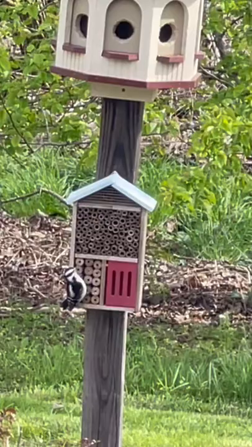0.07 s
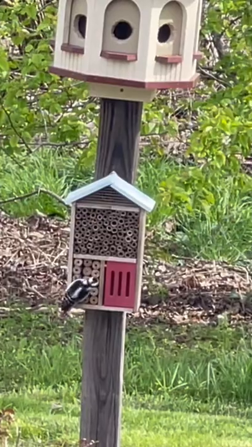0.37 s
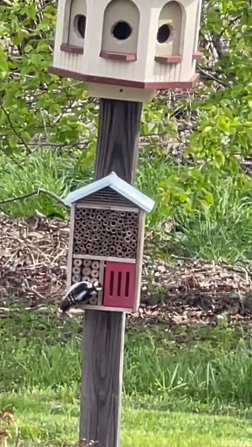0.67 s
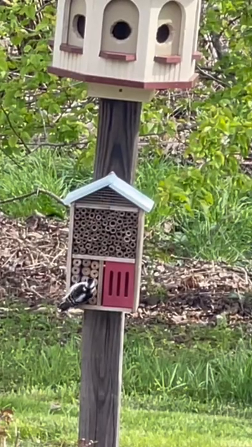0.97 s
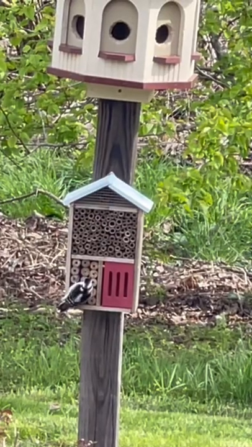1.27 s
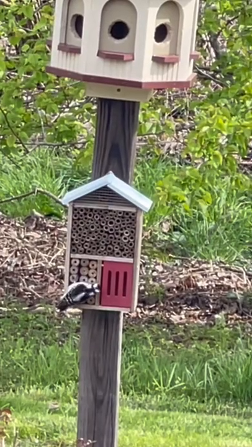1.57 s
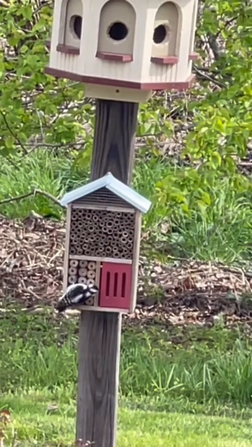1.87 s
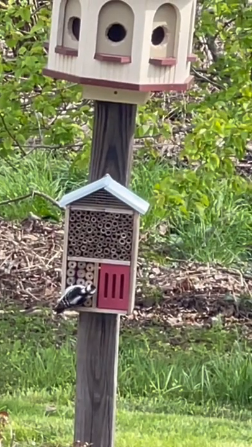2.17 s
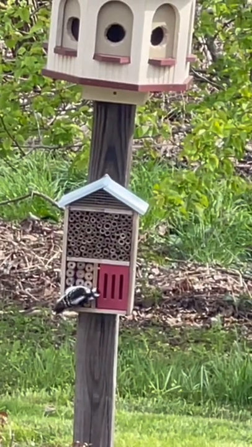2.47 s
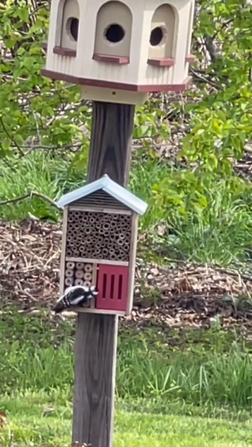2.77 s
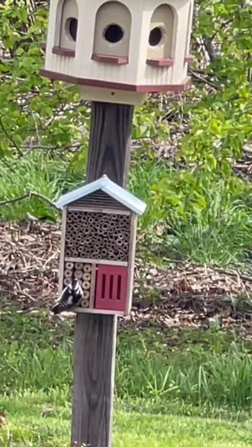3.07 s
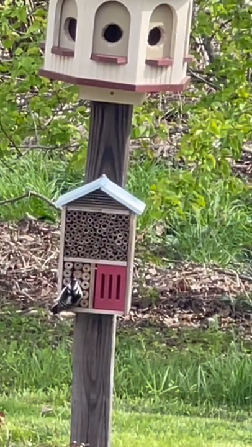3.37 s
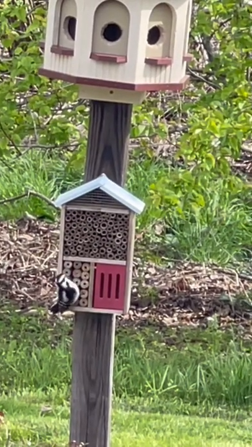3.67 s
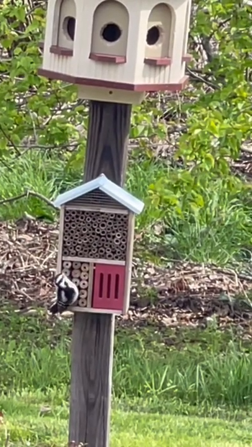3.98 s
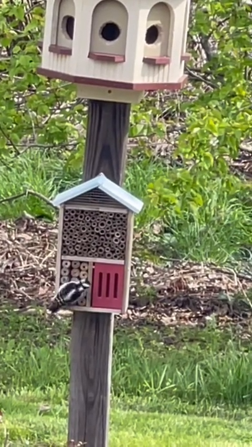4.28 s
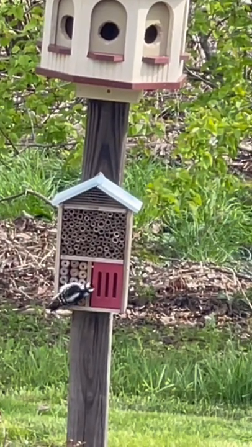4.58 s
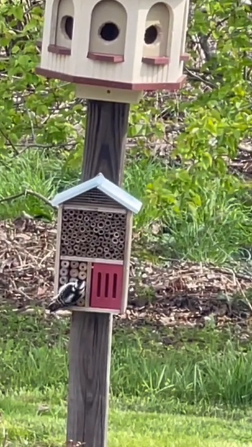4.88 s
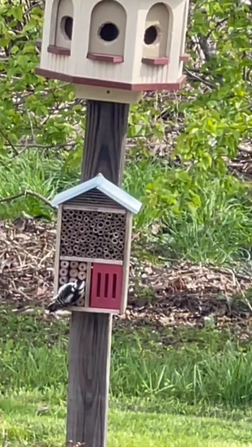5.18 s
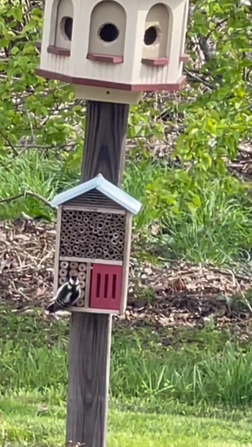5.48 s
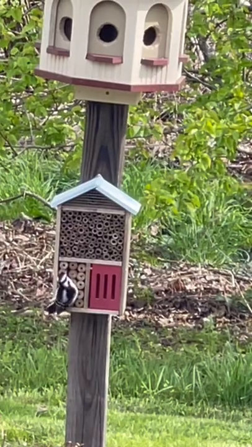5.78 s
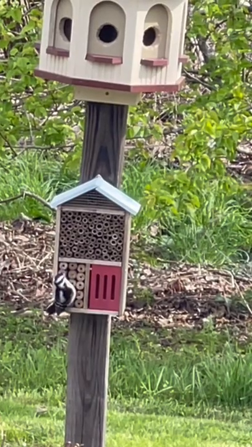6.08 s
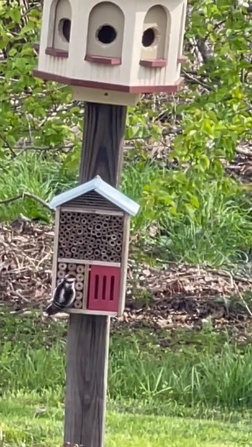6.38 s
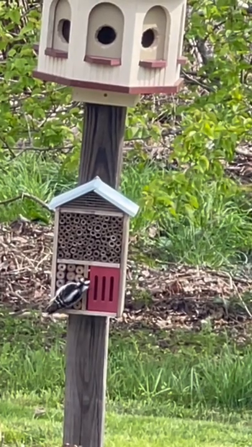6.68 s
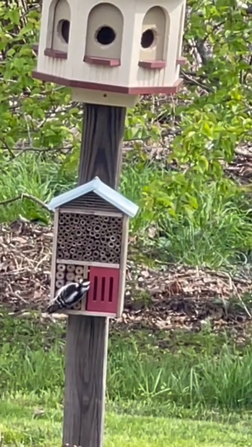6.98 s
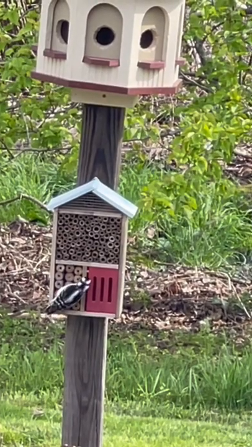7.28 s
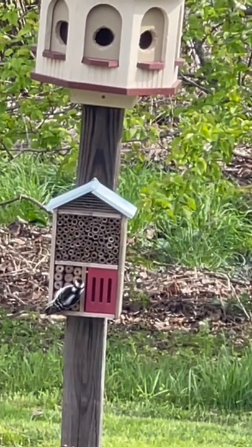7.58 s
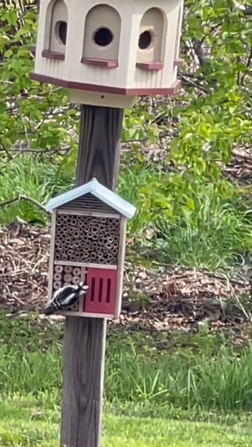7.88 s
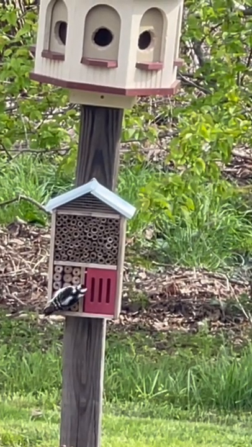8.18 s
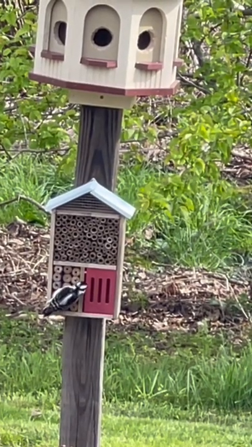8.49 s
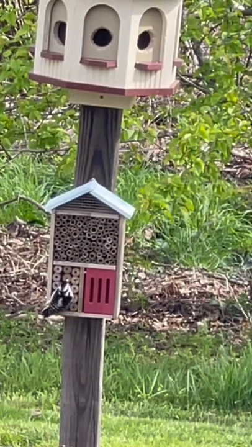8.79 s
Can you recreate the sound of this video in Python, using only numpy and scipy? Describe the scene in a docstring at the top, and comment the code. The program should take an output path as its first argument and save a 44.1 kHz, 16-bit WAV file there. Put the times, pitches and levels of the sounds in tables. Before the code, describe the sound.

Close by and slightly left, a small woodpecker taps on a wooden insect house in five quick bursts of dry, partly hollow knocks. Four come in the first half; then a finch twitters softly in the pause before the last and longest burst. Distant birds buzz, whistle and chirp faintly over a low outdoor rumble, and a few puffs of air bump the microphone.

```python
"""Woodpecker at a backyard insect house

Close to the microphone, a little left, a small woodpecker drums five quick bursts on a wooden insect
house on a post, ringing its frame, bored blocks and hollow chamber. A finch twitters nearby; farther
off, one bird repeats a falling buzz while others whistle and chirp in the trees. A low outdoor rumble
and a faint hiss lie under the quiet yard, and a few puffs of air bump the two-port stereo microphone."""
import sys
import numpy as np
from scipy import signal
from scipy.fft import rfft, irfft
from scipy.io import wavfile
from scipy.ndimage import map_coordinates

SR = 44100
rng = np.random.default_rng(int(sys.argv[2]) if len(sys.argv) > 2 else 0)


def dump(signal):
    """Clip the signal to [-1, 1] and save it as 16-bit WAV at the path in sys.argv[1]."""
    limited = np.clip(np.atleast_2d(signal).T, -1, 1)
    pcm = np.round(limited * 32767).astype(np.int16)
    wavfile.write(sys.argv[1], SR, pcm)


N = 390285

# spectrum of the outdoor rumble: f/Hz, relative level/dB
RUMBLE_SPECTRUM = [(20, -37), (49, -4), (76, -2.5), (134, -7), (329, -25.5), (580, -20), (1490, -34.5),
                   (2400, -39), (3120, -80.5)]
# swells and lulls of the rumble's low end: t/s, gain/dB
RUMBLE_SWELLS = [(.2, 3), (3.5, 7.5), (3.699, -2), (4, -4), (4.2, 3.5), (7.6, 6), (7.95, -2), (8.85, 6)]
# hiss of leaves and distant birds: f/Hz, relative level/dB
HISS_SPECTRUM = [(1500, 1.5), (2400, -2), (3100, 2), (4100, -13), (6000, -18.5), (12000, -15.5),
                 (13500, -44)]
# the finch's arched notes: t/s, length/s, top f/Hz, end f/Hz, level/dB
FINCH_ARCHES = [(2.02, .07, 4740, 4450, -72.5), (2.613, 0.058, 4770, 4400, -61.5),
                (4.889, 0.073, 6600, 3780, -63), (5.005, 0.038, 4250, 4080, -58),
                (5.092, 0.073, 6660, 3860, -58), (5.204, 0.032, 4485, 4430, -55.5),
                (5.289, 0.057, 6710, 6020, -62.5), (5.384, .06, 4710, 4930, -60),
                (5.765, 0.045, 7900, 6300, -57.5), (8.27, 0.077, 7750, 6150, -69.5),
                (8.539, 0.078, 7480, 5550, -65)]
# its falling slurs: t/s, length/s, start f/Hz, level/dB
FINCH_SLURS = [(0.034, 0.061, 6490, -57), (1.462, 0.042, 4570, -70.5), (3.15, 0.054, 5660, -74.5),
               (3.201, 0.056, 4470, -65.5), (3.334, 0.09, 4555, -62), (3.572, 0.065, 4450, -71),
               (4.147, 0.042, 6400, -75), (5.492, 0.038, 8760, -55), (5.616, 0.054, 4870, -57.5),
               (6.07, 0.06, 6960, -60), (6.645, 0.054, 6180, -55), (7.688, 0.028, 6650, -74),
               (7.796, 0.067, 4360, -67.5), (7.946, 0.042, 4460, -62), (8.129, 0.055, 4940, -63),
               (8.338, 0.048, 5420, -58), (8.598, .075, 5270, -59.5)]
# its raspy two-voiced notes: t/s, length/s, start f/Hz, end f/Hz, level/dB
FINCH_RASPS = [(0.877, 0.035, 9240, 8800, -71.5), (5.579, 0.044, 4620, 4560, -58),
               (5.87, 0.024, 5000, 3820, -62.5), (5.986, 0.023, 4320, 3380, -62.5),
               (6.188, 0.049, 5650, 3210, -60), (6.349, .045, 6290, 3740, -58),
               (6.535, 0.04, 6060, 3820, -59.5), (6.632, 0.13, 6110, 3750, -61),
               (6.796, 0.21, 4290, 4670, -72.5)]
# distant whistles, rising or nearly level: t/s, length/s, start f/Hz, end f/Hz, level/dB
FAR_WHISTLES = [(0.145, 0.11, 2890, 3690, -65), (2.126, 0.22, 4650, 6680, -75.5),
                (2.14, 0.23, 3294, 4610, -70), (2.36, 0.12, 4430, 7050, -65),
                (3.908, 0.052, 2650, 3350, -73), (7.013, 0.11, 4500, 6580, -74.5),
                (7.049, 0.047, 2785, 3170, -68.5), (7.363, 0.095, 6360, 6270, -74),
                (8.184, 0.24, 3040, 3197, -66)]
# onsets of the far bird's buzz: t/s
BUZZ_STARTS = [0.212, 1.518, 2.87, 4.302, 5.498, 7.43]
# blows of the beak, in five bursts: t/s, level/dB
BEAK_BLOWS = [(0.474, -35.5), (0.528, -31), (0.585, -29.5), (0.644, -29), (0.703, -30), (0.761, -29),
              (0.822, -28), (0.891, -36), (1.531, -38), (1.597, -34.5), (1.659, -33), (2.331, -45),
              (2.389, -43), (2.447, -39.5), (2.51, -37.5), (2.575, -36), (2.642, -36), (2.706, -38),
              (2.775, -38.5), (4.255, -44.5), (4.319, -40), (4.379, -38.5), (4.439, -36), (4.505, -36),
              (4.573, -38.5), (4.65, -42.5), (7.808, -48.5), (7.867, -42), (7.928, -38.5), (7.991, -36.5),
              (8.057, -34.5), (8.12, -34.5), (8.184, -35), (8.251, -36), (8.316, -34.5), (8.39, -35),
              (8.463, -35.5), (8.53, -35.5), (8.598, -34.5)]
# how strongly the pecked spot knocks the hollow chamber: t/s, relative level/dB
CHAMBER_DRIVE = [(1.7, -18.5), (2.3, 5.5), (2.6, 4), (4.3, 1), (4.42, -4), (4.65, 5), (7.86, 3.5),
                 (7.99, -6.5)]
# modes of the wooden house: f/Hz, t60/s, level pecked on the frame/dB, level pecked on the blocks/dB
HOUSE_MODES = [(775, 0.0057, 4.5, 4.5), (957, 0.022, 3.5, 0), (1072, 0.018, 1.5, 1), (1300, 0.006, -1, 0),
               (1478, 0.017, -5.5, -2.5), (1673, 0.017, -5.5, -1.5), (2103, 0.028, -11, -15.5),
               (2335, 0.012, -11, -16.5), (3397, 0.012, -15.5, -9), (3910, 0.012, -24.5, -27),
               (4387, 0.013, -23.5, -15)]
# modes of its hollow chamber: f/Hz, relative level/dB, t60/s
CHAMBER_MODES = [(548, -3, 0.055), (614, 1, 0.063)]
# tick of beak on wood: f/Hz, relative level/dB
TICK_SPECTRUM = [(1500, 14), (3500, 3.5), (6000, -7), (9000, 1), (11500, 5.5), (13000, -100)]
# chirp runs in the trees: t/s, count, spacing/s, start f/Hz, level/dB, upper voice relative level/dB
CHIRP_RUNS = [(.478, 4, .119, 3500, -68, -15), (1.18, 1, 0, 3400, -70, -7), (1.308, 1, 0, 4650, -68, -12),
              (3.05, 2, .872, 4950, -73, -14), (4.935, 9, .332, 2800, -72, -25)]
# puffs of air on the microphone: t/s, level/dB, start f/Hz
AIR_PUFFS = [(3.152, -17.5, 81), (3.201, -19, 118), (3.364, -21.5, 166), (3.403, -22.5, 110),
             (3.472, -26.5, 120), (6.118, -32.5, 91), (6.483, -29, 75), (7.157, -11, 340),
             (7.299, -28, 198), (7.332, -25, 129), (7.519, -28.5, 103), (8.15, -31.5, 356)]
# phase between the microphone ports: f/Hz, lead of the left port/rad
PORT_LEAD = [(200, 0), (500, .3), (3300, .55), (6500, .5), (8300, 0), (9600, -3), (11600, -6.2)]
# the ports' dip in the treble: f/Hz, gain/dB
PORT_RESPONSE = [(9500, 0), (10500, -6.5), (11500, -6)]

NOTE_EDGE = .24  # share of a bird's note spent fading in and out


def gain_of(db):
    """Decibels to gain."""
    return 10 ** (np.asarray(db) / 20)


def unit_rms(x):
    """Scales to rms 1."""
    return x / np.sqrt(np.mean(x ** 2) + 1e-20)


def curve_at(points, hz):
    """Reads a curve on a log-frequency axis."""
    f, value = np.transpose(points)
    return np.interp(np.log(hz + 1), np.log(f + 1), value)


def add(mix, s, sound):
    """Mixes a sound in at time s."""
    part = mix[max(round(s * SR), 0):][:len(sound)]
    part += sound[:len(part)]


def progress(length):
    """Runs from 0 to 1 over length seconds."""
    return np.linspace(0, 1, int(length * SR))


def coloured(spectrum, size):
    """Noise of rms 1 with the given spectrum."""
    gain = gain_of(curve_at(spectrum, np.fft.rfftfreq(size, 1 / SR)))
    return unit_rms(irfft(rfft(rng.standard_normal(size)) * gain, size))


def waver(size, hz):
    """A smooth curve through hz random points a second."""
    at = np.arange(size) * hz / SR
    return map_coordinates(rng.standard_normal(int(at[-1]) + 2), [at], order=3, mode="nearest")


def rumble(base_db=-52, split_hz=330):
    """Outdoor rumble all around: the low end swells and lulls, the rest wavers slightly."""
    air = np.array([coloured(RUMBLE_SPECTRUM, N) for _ in range(3)])  # shared, left, right
    low = signal.sosfiltfilt(signal.butter(2, split_hz, fs=SR, output="sos"), air)
    swell_db = np.interp(np.arange(N) / SR, *np.transpose(RUMBLE_SWELLS)) + waver(N, 9.7)
    air = low * gain_of(swell_db) + (air - low) * gain_of(waver(N, 1.454))
    return gain_of(base_db) * (air[0] + .47 * air[1:])


def leaf_hiss(base_db=-73):
    """Leaves and distant birds blur into a faint, wide hiss."""
    hiss = np.array([coloured(HISS_SPECTRUM, N) for _ in range(3)])  # shared, left, right
    hiss *= gain_of(base_db + waver(N, .73))
    return hiss[0] + hiss[1:]


def note(hz, db, edge=NOTE_EDGE, overtone_db=-31, flutter_db=4, drift=.011):
    """A bird's fluttering tone along a pitch curve, with a weak octave and soft ends."""
    phase = 2 * np.pi * np.cumsum(hz * (1 + drift * waver(len(hz), 800))) / SR
    envelope = signal.windows.tukey(len(hz), edge) * gain_of(flutter_db * waver(len(hz), 118.4))
    tone = np.sin(phase) + gain_of(overtone_db) * np.sin(2 * phase)
    return gain_of(db) * unit_rms(envelope * tone)


def finch(arch_start_hz=3750, top_at=.38, straight_hz=6400, slur_drop=.26, quavers_hz=(103, 148)):
    """A finch nearby: quick arches, falling slurs, and rasps from two voices quavering very fast."""
    out = np.zeros(N)
    for s, length, top_hz, end_hz, db in FINCH_ARCHES:
        u = progress(length)
        rising = top_hz - (top_hz - arch_start_hz) * (1 - u / top_at) ** 2
        falling = top_hz - (top_hz - end_hz) * ((u - top_at) / (1 - top_at)) ** 2
        add(out, s, note(np.where(u < top_at, rising, falling), db, overtone_db=-20))
    for s, length, start_hz, db in FINCH_SLURS:
        # slurs from below straight_hz hold before they drop; higher ones drop at once
        fall = progress(length) ** ((straight_hz / start_hz) ** 1.9)
        add(out, s, note(start_hz * (1 - slur_drop * fall), db, overtone_db=-21.5))
    for s, length, start_hz, end_hz, db in FINCH_RASPS:
        u = progress(length)
        centre_hz = start_hz + (end_hz - start_hz) * u
        swing_hz = 950 * np.exp(-1.1 * u)
        for rate_hz in quavers_hz:
            hz = centre_hz + swing_hz * np.cos(2 * np.pi * rate_hz * length * u)
            add(out, s, note(hz, db, edge=NOTE_EDGE / 2, drift=.087) / np.sqrt(2))
    return out


def far_whistles():
    """Birds farther off whistle glides whose pitch bends unevenly on the way."""
    out = np.zeros(N)
    for s, length, start_hz, end_hz, db in FAR_WHISTLES:
        u = progress(length)
        bend = 1 + .018 * waver(len(u), 45)
        add(out, s, note(start_hz * (end_hz / start_hz) ** u * bend, db, drift=.012))
    return out


def far_buzz(length=.33, buzz_hz=45, base_db=-69):
    """A far bird's call: a sinking chain of tiny upward sweeps, each a swell of its own."""
    out, t = np.zeros(N), np.arange(int(length * SR)) / SR
    centre_hz = np.interp(t, [0, .19, length], [3520, 2820, 2760])
    for s in BUZZ_STARTS:
        cycle = 2 * np.pi * buzz_hz * t + .8 * waver(len(t), 15)
        sweep_hz = 330 * signal.sawtooth(cycle)
        swell = 1 - .7 * np.cos(cycle)
        add(out, s, note(centre_hz + sweep_hz, base_db) * swell)
    return out


def ring(hz, t60, db, t, scatter_db):
    """Dying modes; every blow lands a little differently, so their levels and tuning scatter."""
    weight, detune = rng.standard_normal((2, len(hz)))
    sign, t = (-1) ** np.arange(len(hz)), t[:, None]
    decay = gain_of(db + scatter_db * weight - 60 * t / t60)
    return (sign * decay * np.sin(2 * np.pi * hz * (1 + .013 * detune) * t)).sum(1)


def peck(db, chamber_db, tilt_db_per_octave, rattle=.082, rattle_s=.013, tick_s=.0068):
    """The frame gives one clean knock; the loose blocks over the hollow chamber chatter briefly."""
    t = np.arange(int(.09 * SR)) / SR
    loose = np.clip((chamber_db + 16.5) / 8, .08, 1)  # near 0 on the frame, 1 on the blocks
    contact = rattle * loose * rng.standard_normal(len(t)) * np.exp(-t / rattle_s)
    contact[0] = 1  # the blow itself
    hz, t60, frame_db, block_db = np.transpose(HOUSE_MODES)
    mode_db = frame_db + loose * (block_db - frame_db) + tilt_db_per_octave * np.log2(hz / hz[0])
    house = ring(hz, t60, mode_db, t, scatter_db=1.8)
    wood = signal.fftconvolve(contact, house)[:len(t)] * (1 - np.exp(-t / .0019))
    hz, mode_db, t60 = np.transpose(CHAMBER_MODES)
    chamber = ring(hz, t60, mode_db, t, scatter_db=7) * (1 - np.exp(-t / .00095))
    tick = coloured(TICK_SPECTRUM, len(t)) * np.exp(-t / (tick_s * (.71 + loose)))
    tick_db = -50 + 27 * loose + .71 * (db + 46) + 2 * tilt_db_per_octave  # harder blows are brighter
    parts = (wood, -9), (chamber, chamber_db - 5), (tick, tick_db)
    attack = slice(int(.01 * SR))  # the parts are balanced over their first 10 ms
    return sum(gain_of(db + part_db) * part / part[attack].std() for part, part_db in parts)


def woodpecker(lead_s=.001216, bounce_s=.00645, bounce_gain=.3, accent_at_s=.822):
    """Close bursts of about fifteen pecks a second; each knock also bounces off the ground."""
    out = np.zeros(N)
    sharpest = np.argmin([abs(s - accent_at_s) for s, db in BEAK_BLOWS])  # one blow cracks brighter
    for k, (s, db) in enumerate(BEAK_BLOWS):
        chamber_db = np.interp(s, *np.transpose(CHAMBER_DRIVE))
        knock = peck(db, chamber_db, tilt_db_per_octave=4.5 * (k == sharpest))
        add(out, s - lead_s, knock)
        add(out, s - lead_s + bounce_s, bounce_gain * knock)
    return out


def tree_chirps(length=.048, voice_gap_hz=2730):
    """Birds off in the trees drop runs of faint chirps, each with a second voice falling above it."""
    out = np.zeros(N)
    fall = 1 - .27 * progress(length) ** 1.3
    for start, count, spacing, hz, db, upper_db in CHIRP_RUNS:
        for k in range(round(count)):
            lower = note(hz * fall, db)
            upper = note((hz + voice_gap_hz) * fall, db + upper_db)
            add(out, start + k * spacing, lower + upper)
    return out


def microphone_puffs(length=.074, settle_hz=54):
    """Each push of air swings the microphone a few times, ever more slowly."""
    out, u = np.zeros(N), progress(length)
    envelope = np.tanh((u / .042) ** 2) * np.exp(-(u / .395) ** 2)
    for s, db, start_hz in AIR_PUFFS:
        hz = settle_hz + (start_hz - settle_hz) * np.exp(-9.12 * u)
        add(out, s, gain_of(db) * envelope * np.sin(2 * np.pi * np.cumsum(hz) / SR))
    return out


def yard(x, wet_db, t60, dull_hz, echoes_per_s=2000):
    """The direct sound plus sparse, dull echoes from ground, trees and walls, in stereo."""
    t = np.arange(SR // 2) / SR
    taps = rng.standard_normal((3, len(t)))  # shared, left, right
    taps *= (rng.random(taps.shape) < echoes_per_s / SR) * (t > .004)
    taps = signal.lfilter(*signal.butter(1, dull_hz, fs=SR), taps * gain_of(-60 * t / t60))
    tail = taps[0] + .082 * taps[1:]  # the two ports lie close together and hear much the same
    echoes = signal.fftconvolve(x[None], tail / np.linalg.norm(tail[0]), axes=1)[:, :N]
    return x + gain_of(wet_db) * echoes


def scene():
    """From the microphone: the house close and slightly left, the finch nearby, other birds beyond."""
    pecks = yard(woodpecker(), wet_db=-20, t60=.2, dull_hz=3250) * gain_of([[.9], [-.9]])
    song = yard(finch(), wet_db=-5, t60=.23, dull_hz=6130)
    far_birds = yard(far_buzz() + tree_chirps() + far_whistles(), wet_db=-3.5, t60=.5, dull_hz=4000)
    return pecks + song + far_birds + rumble() + leaf_hiss() + microphone_puffs()


def record(dry, band_limit_hz=13000):
    """Short end fades; the microphone's two ports dip the treble and differ in phase; a band limit."""
    hz = np.fft.rfftfreq(N, 1 / SR)
    faded = dry * signal.windows.tukey(N, .002)
    phase_shift = np.exp(.5j * np.outer([1, -1], curve_at(PORT_LEAD, hz)))
    ports = irfft(rfft(faded) * phase_shift * gain_of(curve_at(PORT_RESPONSE, hz)), N)
    lowpass = signal.firwin(401, band_limit_hz, window=("kaiser", 9), fs=SR)
    return signal.oaconvolve(ports, lowpass[None], "same")


dry = scene()
out = record(dry)
dump(out)
```